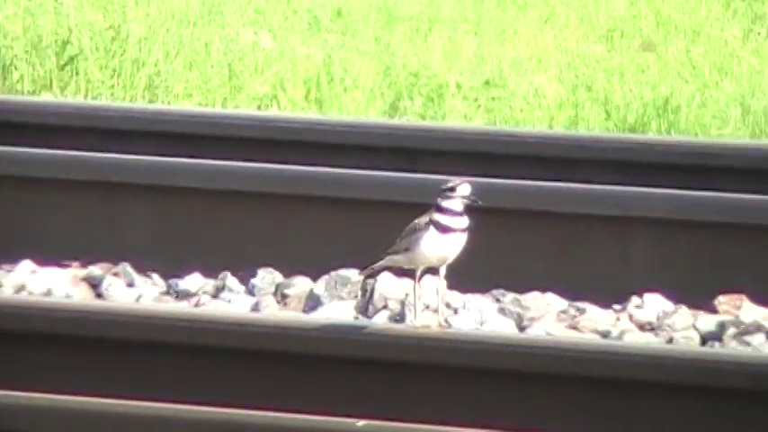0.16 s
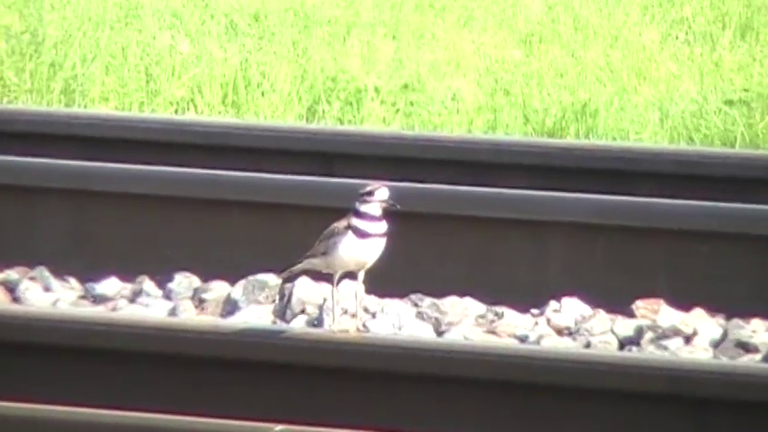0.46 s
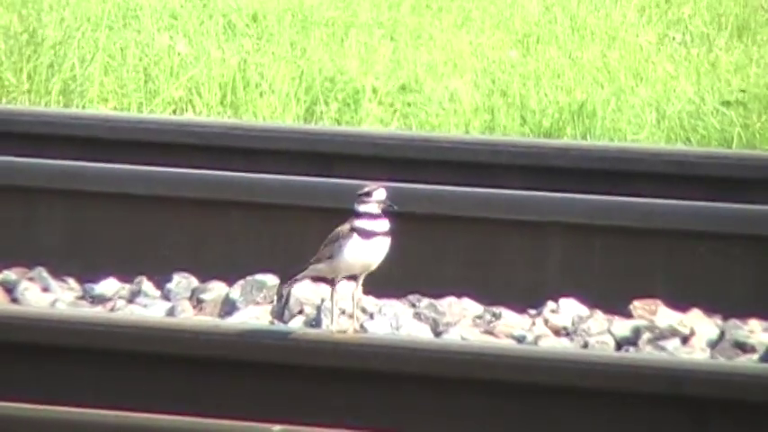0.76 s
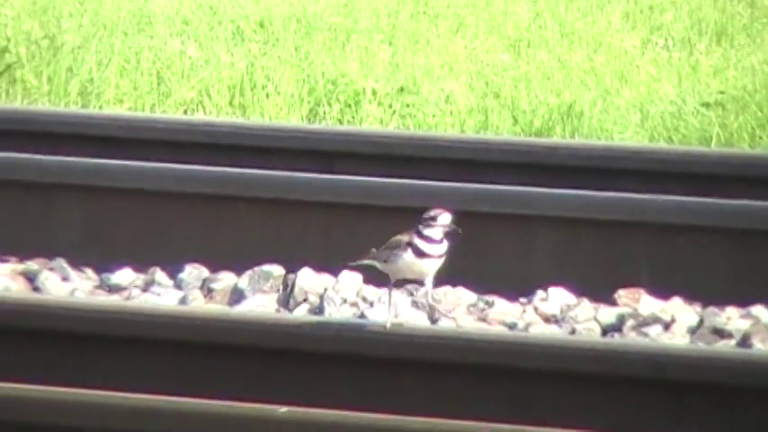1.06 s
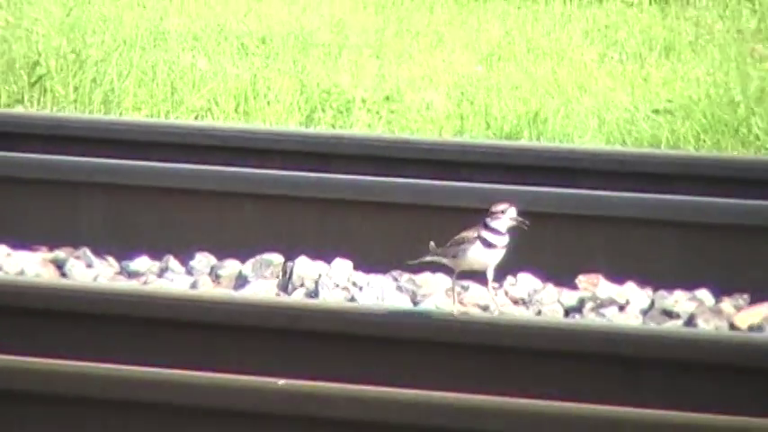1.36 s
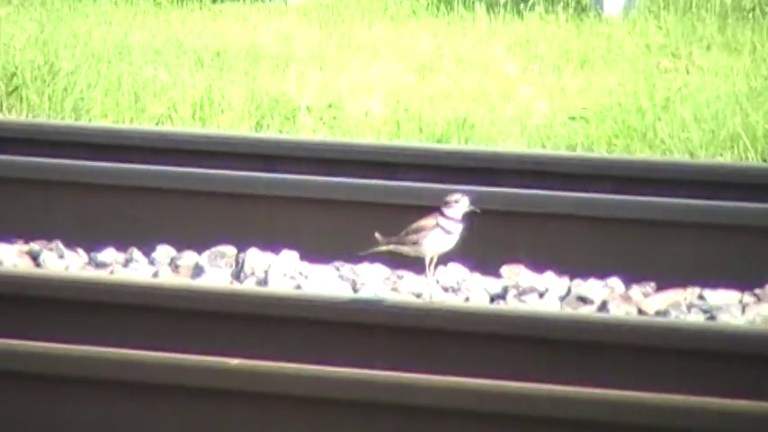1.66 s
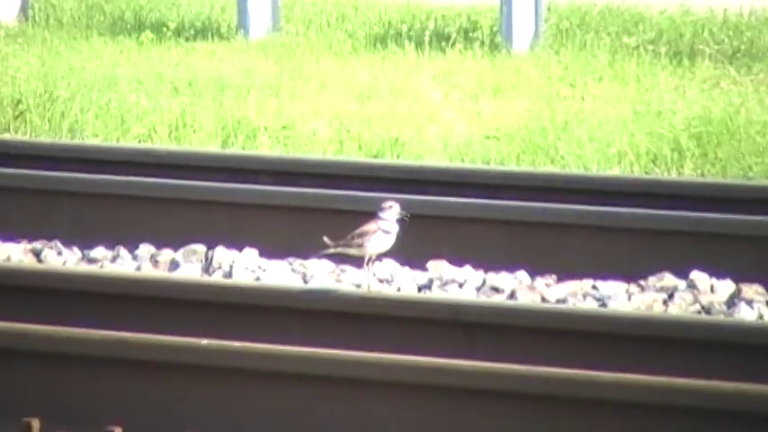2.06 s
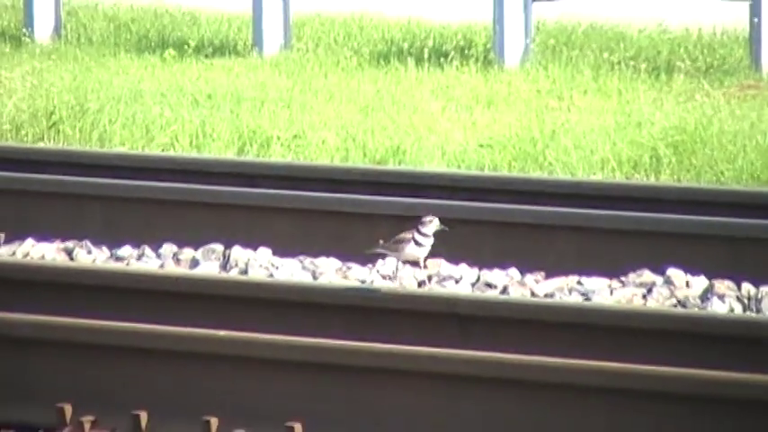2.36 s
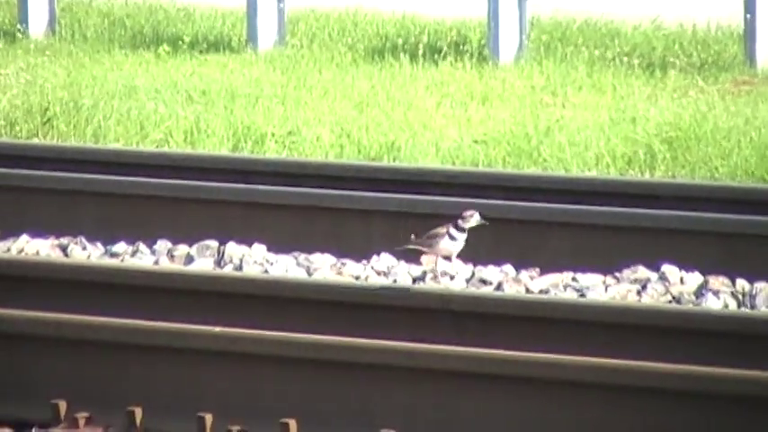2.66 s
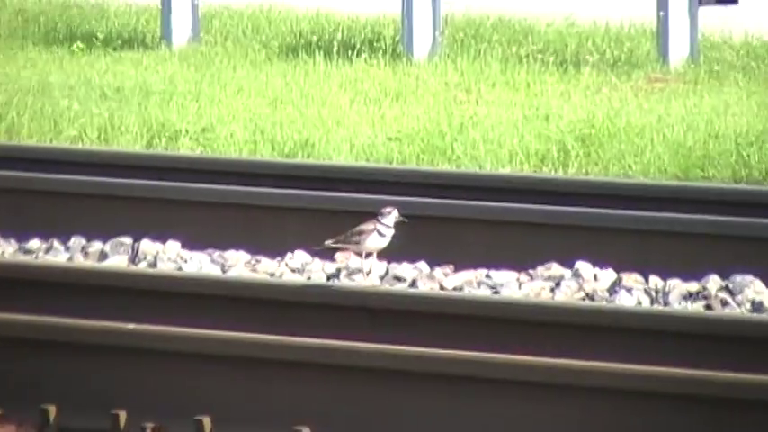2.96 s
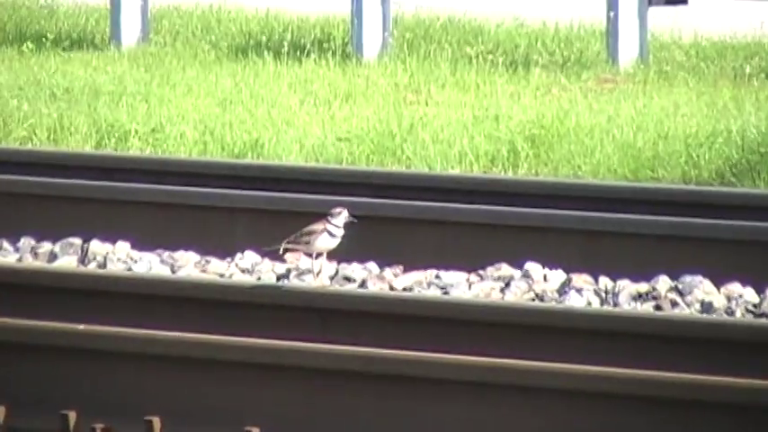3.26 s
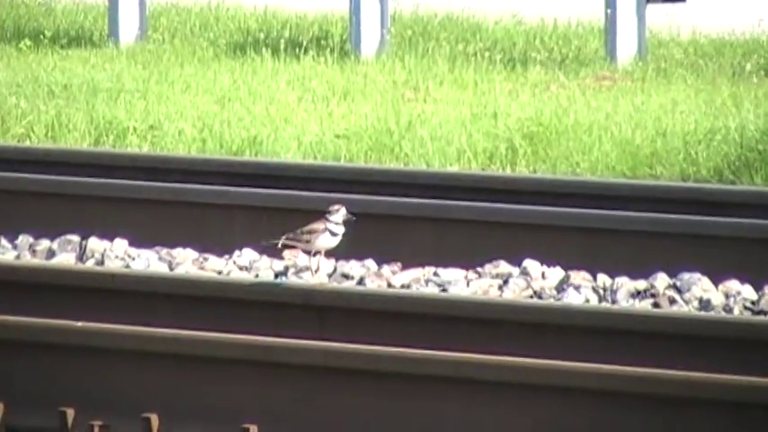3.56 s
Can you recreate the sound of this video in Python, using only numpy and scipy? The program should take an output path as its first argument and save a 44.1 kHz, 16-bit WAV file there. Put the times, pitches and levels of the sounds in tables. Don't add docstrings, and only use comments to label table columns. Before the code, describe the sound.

Sharp piping bird calls repeat evenly outdoors while a heavy truck swells past over distant traffic.

```python
import sys
import numpy as np
from scipy import signal
from scipy.fft import rfft, irfft, next_fast_len
from scipy.io import wavfile
from scipy.ndimage import uniform_filter1d

SR = 44100
rng = np.random.default_rng(int(sys.argv[2]) if len(sys.argv) > 2 else 0)


def natural_amplitude(level_db):
    exponent = np.asarray(level_db, float) / 20
    return 10 ** exponent


def transcribe(u):
    v = np.clip(np.atleast_2d(u).T, -1, 1)
    q = np.round(v * 32767).astype(np.int16)
    wavfile.write(sys.argv[1], SR, q)


N = 164052


def rms_one(x):
    return x / np.sqrt(np.mean(x ** 2) + 1e-20)


def in_time(rows, start=0):
    s, *columns = np.transpose(rows)
    return [np.interp(np.arange(N) / SR - start, s, c) for c in columns]


def at_hz(points, hz):
    return np.interp(np.log(hz), np.log(np.array(points)[:, 0]), np.array(points)[:, 1])


def drift(rate):
    r = np.exp(-80 * np.pi * rate / SR)
    slow = signal.lfilter([1], [1, -2 * r, r * r], rng.standard_normal(N // 40 + 2002))[2000:]
    return np.interp(np.arange(N) / 40, np.arange(len(slow)), rms_one(slow))


def sing(hz):
    return np.sin(2 * np.pi * np.cumsum(hz) / SR)


def resonate(x, hz, width_hz):
    r = np.exp(-np.pi * width_hz / SR)
    poles = [1, -2 * r * np.cos(2 * np.pi * hz / SR), r * r]
    return signal.lfilter(np.array([1, 0, -1]) * (1 - r * r) / 2, poles, x + 1e-18)


def pan(x, db):
    return x * natural_amplitude(np.array([[db / 2], [-db / 2]]))


def spread(mid, side, hz):
    # f/Hz, level/dB
    side_level = [(30, 5), (125, -17), (250, -14.5), (600, -12), (1100, -13), (2000, -4), (4000, -6.5),
                  (12000, -8)]
    # f/Hz, level/dB
    lean = [(30, -.4), (60, .3), (125, 2.1), (250, 3), (500, 1.6), (1000, .2), (4000, 0), (12000, .3)]
    return pan(mid + natural_amplitude(at_hz(side_level, hz)) * side * [[1], [-1]], at_hz(lean, hz))


def banded_noise(spectrum, patchy_db, tilt_db=0):
    out, together = 0, drift(1.5)
    edges = 21.5 * 2 ** np.arange(0, 9.7, .4)
    white = rng.standard_normal((2, 2, N))
    for k, (low, high) in enumerate(zip(edges, edges[1:])):
        band = signal.butter(2, [low, high], "band", fs=SR, output="sos")
        mid, side = signal.sosfilt(band, white[k % 2])
        hz = np.sqrt(low * high)
        octaves_out = max(np.log2(spectrum[0][0] / hz), 0) + max(np.log2(hz / spectrum[-1][0]), 0)
        level_db = at_hz(spectrum, hz) - 24.0 * octaves_out + tilt_db * np.log2(hz / 1000)
        flicker_db = patchy_db * (.5 * together + drift(6.6))
        out = out + natural_amplitude(level_db + flicker_db) * spread(mid, side, hz)
    return rms_one(out)


def bird():
    # t/s, level/dB, top f/Hz, held f/Hz, extra level at the top/dB
    calls = [
        (0.118, -28.5, 4750, 4304, 3),
        (0.7078, -27, 4854, 4356, 6),
        (1.3555, -30, 4914, 4350, 6),
        (2.081, -30.5, 4900, 4390, 5),
        (2.8607, -29.5, 4710, 4360, 3.5),
        (3.4995, -29.5, 5000, 4430, 2.5),
    ]
    # length/s, overtone level/dB, swell/Hz, upturn/Hz
    delivery = [(0.118, -2, 30, 170), (.122, -1, 50.4, 121), (.122, 1.5, 60.55, 109),
                (.125, 2.5, 45.05, 90), (.126, -1, 45, 230), (.124, -4, 79.5, 199)]
    # share of the length/0-1, leap/0-1, swell/0-1, upturn/0-1, level/dB
    shape = [(0, -.15, 0, 0, -18), (.035, 0.67, 0.03, 0, -5), (.09, 1, 0.08, 0.03, -0.5),
             (.17, 0.94, 0.05, 0.03, 1.5), (.25, .55, .3, 0, -0.5), (.37, 0, 0.79, 0.04, -0.5),
             (.54, 0.02, 1, 0.03, 1), (.76, 0, 0, 0, 1), (.93, 0.06, 0.1, 0.6, 0), (1, 0.05, 0, 0.9, -27)]
    # multiple of the strong tone, level/dB, extra level at the top of the leap/dB
    partials = [(.5, -28, 2), (1, 0, 0), (2, -25, 5), (2.5, -31, 3), (3, -28, 0)]
    waver_hz, flutter_db = 9 * drift(46), .8 * drift(90)
    out = np.zeros(N)
    share, lifts, swells, upturns, levels_db = np.transpose(shape)
    for (start, db, top_hz, held_hz, top_db), row in zip(calls, delivery):
        length, bright_db, swell_hz, upturn_hz = row
        now = slice(int(start * SR), int((start + length) * SR))
        u = np.linspace(0, 1, now.stop - now.start)
        lift = uniform_filter1d(np.interp(u, share, lifts), size=200)
        bends_hz = swell_hz * swells + upturn_hz * upturns
        bend_hz = uniform_filter1d(np.interp(u, share, bends_hz), size=400)
        hz = held_hz + lift * (top_hz - held_hz) + bend_hz + waver_hz[now]
        phase = 2 * np.pi * np.cumsum(hz) / SR
        shape_db = uniform_filter1d(np.interp(u, share, levels_db), size=120)
        gain = natural_amplitude(db + shape_db + top_db * np.clip(lift, 0, 1) + flutter_db[now])
        for multiple, partial_db, leap_db in partials:
            level = natural_amplitude(partial_db + bright_db * (multiple != 1) + leap_db * lift)
            out[now] += gain * level * np.sin(multiple * phase)
    return out


def field(x):
    # delay/s, level/dB, pan/dB
    echoes = [
        (0.058, -26, 2),
        (.021, -28, -2),
    ]
    t60_s, tail_db, blur_hz = 1.3, -23.5, 40
    out = 0
    for delay, db, pan_db in echoes:
        echo = np.roll(x, int(delay * SR)) * (np.arange(N) > delay * SR)
        out = out + pan(natural_amplitude(db) * echo, pan_db)
    t = np.arange(SR) / SR
    whole = signal.hilbert(x, next_fast_len(N))[:N]
    for path in range(3):
        tail = rng.standard_normal((2, SR)) * natural_amplitude(-60 * t / t60_s) * np.clip(t / .04, 0, 1)
        tail = (tail[0] + .5 * tail[1] * [[1], [-1]]) / np.sqrt(3 * np.sum(tail[0] ** 2))
        turning = np.exp(2j * np.pi * np.cumsum(blur_hz * drift(60)) / SR)
        blurred = np.real(whole * turning)
        out = out + natural_amplitude(tail_db) * signal.fftconvolve(blurred[None], tail, axes=1)[:, :N]
    return out


def tyres():
    # t/s, level/dB, brightness in steps of 3.21 dB per octave
    passing = [
        (0, -67, 3.5),
        (.9, -43.5, 0.64),
        (1.9, -33, -.5),
        (2.35, -30.5, -0.41),
        (2.6, -28, -0.02),
        (3.1, -27.5, -0.24),
        (3.45, -32, 0.14),
        (3.72, -32, -0.17),
    ]
    # f/Hz, level/dB per Hz
    colour = [(150, -39), (250, -16), (365, -19), (421, -19), (709, -10), (1170, -7), (1920, -17),
              (8200, -30), (10900, -44), (14200, -82), (22000, -120)]
    pass_db, tilt_db = in_time(passing)
    return natural_amplitude(pass_db) * banded_noise(colour, patchy_db=1.03, tilt_db=3.21 * tilt_db)


def engine():
    # t/s, firing f/Hz, exhaust level/dB, firing thud level/dB
    revs = [(0, 74.94, -43, -35.5), (.35, 78.6, -37, -28.5), (.75, 81.17, -45, -40),
            (1.12, 85.04, -41.5, -34.5), (1.5, 87.4, -39, -59), (1.92, 90.7, -38.5, -41),
            (2.45, 95, -33, -48), (2.98, 100.4, -37.5, -43.5), (3.2, 95, -36, -50),
            (3.45, 88.74, -36.5, -45.5), (3.72, 82.9, -41.5, -39.5)]
    # t/s, f/Hz
    exhaust = [(0, 218), (.5, 221), (1, 297), (2.4, 366), (3.05, 356.9), (3.45, 224.3), (3.72, 202.5)]
    # order, level/dB
    orders = [(9, 2), (12, 3.5), (14, 3.5), (15, -2), (16, -0.5), (17, 0), (18, -4.5), (19, -10), (20, 3),
              (21, -5.5), (22, -0.5), (23, -1.5), (24, -1), (26, -14), (30, -1), (33, -9), (34, -6),
              (36, -11)]
    cylinders, pipe_width_hz = 6, 120
    firing_hz, exhaust_db, thud_db = in_time(revs)
    pipe_hz, = in_time(exhaust)
    cycle_hz = firing_hz / cylinders * (1 + 0.0017 * drift(3.76))
    phase = 2 * np.pi * np.cumsum(cycle_hz) / SR
    out = pan(natural_amplitude(thud_db + 1.0 + 2.0 * drift(5.8)) * np.sin(cylinders * phase), 0.21)
    for order, db in orders:
        pipe = 0.2 + 1 / (1 + ((order * cycle_hz - pipe_hz) / pipe_width_hz * 2) ** 2)
        tone = np.sin(order * phase + rng.uniform(0, 2 * np.pi))
        out = out + pan(natural_amplitude(exhaust_db + db + 2 * drift(3.4)) * pipe * tone, 3.5)
    return out


def panels():
    # f/Hz, width/Hz, level/dB, centre t/s, spread/s
    resonances = [(1185, 60, -46, 2.65, .25), (1555, 60, -48, 2.75, .2), (1380, 25, -47, 1.0, .6),
                  (1560, 90, -49, .8, 1.1), (870, 28, -45, 2.8, .2), (235, 80, -35, .35, .25),
                  (180, 60, -34, .75, .25), (190, 70, -37, 3.0, .2), (215, 70, -35, 3.5, .15),
                  (5200, 3000, -55, 1.12, .07), (700, 250, -43, 3.45, .25), (2500, 900, -52, 2.8, .5)]
    out, t = 0, np.arange(N) / SR
    for hz, width_hz, db, centre, spread_s in resonances:
        mid, side = resonate(rng.standard_normal((2, N)), hz, width_hz)
        facing = np.exp(-.5 * ((t - centre) / spread_s) ** 2)
        breakup_db = 3 * drift(9.5)
        out = out + natural_amplitude(db + breakup_db) * facing * rms_one(spread(mid, side, hz))
    return out


def whines():
    # t/s, f/Hz, level/dB
    gears = [
        [(2.3, 1195, -62), (2.41, 1189, -40), (2.55, 1173, -41), (2.64, 1157, -47), (2.72, 1165, -41.5),
         (2.9, 1199, -40), (3.0, 1207, -60)],
        [(2.35, 1530, -62.5), (2.45, 1530, -50), (2.6, 1560, -41), (2.7, 1555, -59), (2.79, 1577, -40),
         (2.86, 1558, -49), (2.95, 1555, -42), (3.15, 1540, -57)],
    ]
    out = 0
    for rows in gears:
        hz, db = in_time(rows)
        flutter_db = 1.5 * drift(18)
        out = out + natural_amplitude(db + 4.5 + flutter_db) * sing(hz + 5 * drift(13.2))
    return out


def whistles():
    # t/s, length/s, start f/Hz, end f/Hz, level/dB
    far = [
        (3.03, .05, 5050, 5080, -55),
        (3.085, .268, 5012, 5030, -42.5),
        (3.36, .075, 4960, 5020, -51),
        (3.546, .034, 5120, 4760, -42),
        (3.58, .18, 4905, 4870, -41),
    ]
    # t/s, length/s, start f/Hz, end f/Hz, level/dB
    chips = [
        (3.484, .016, 7050, 7150, -47),
        (3.498, .014, 7150, 7750, -47),
        (2.851, .014, 7800, 7900, -49),
        (2.866, .018, 8200, 7950, -47),
        (2.985, .02, 7100, 7200, -53),
    ]
    out, fading_db, waver_hz = np.zeros(N), 1.3 * drift(8.5), 9 * drift(27)
    for start, length, from_hz, to_hz, db in far + chips:
        u = np.clip((np.arange(N) / SR - start) / length, 0, 1)
        edge = np.clip(np.minimum(u / .3, (1 - u) / 0.029), 0, 1)
        settle_hz = 90 * np.exp(-u * length / .04) * (length > .1)
        hz = from_hz + u * (to_hz - from_hz) + waver_hz + settle_hz
        out += natural_amplitude(db + fading_db * min(length / 0.12, 1)) * edge * sing(hz)
    return out


def ticks():
    # t/s, level/dB, centre f/Hz, t60/s, pan/dB
    creaks = [(0.0331, -20.5, 6540, 0.0092, 0), (0.033, -29, 2460, 0.0097, -5),
              (0.0334, -32, 3900, .007, -7), (.739, -33, 5800, 0.014, -12), (.748, -42, 4520, 0.015, -2),
              (0.974, -24.5, 764, 0.049, -4), (1.040, -35, 3508, .01, -7.5),
              (1.103, -34, 3550, 0.0093, -11), (1.169, -24, 880, 0.05, -10), (1.722, -39, 8130, .01, -3),
              (1.762, -49, 7500, 0.011, -9), (1.774, -35.5, 8300, 0.02, 4), (1.994, -36, 4990, .01, -2),
              (2.115, -36, 3199, .02, -14), (2.852, -32, 7798, .01, -4), (3.5446, -16, 2610, 0.0044, -3.5),
              (3.547, -29, 1800, .008, -6), (3.545, -22, 5860, 0.0037, -6)]
    out, t = np.zeros((2, N + SR)), np.arange(2000) / SR
    noise = rng.standard_normal((len(creaks), 2, len(t)))
    noise[:, 0, 0] = 5
    for (s, db, hz, t60, pan_db), (mid, side) in zip(creaks, noise):
        burst = (mid + 0.27 * side * [[1], [-1]]) * natural_amplitude(-60 * t / t60)
        for again in range(2):
            burst = resonate(burst, hz, .9 * hz)
        first = int(s * SR)
        out[:, first:first + len(t)] += pan(natural_amplitude(db) * burst / np.abs(burst).max(), pan_db)
    return out[:, :N]


def traffic():
    # f/Hz, level/dB
    bed = [(30, -18.5), (100, -1), (300, -3.5), (700, -9), (1500, -16.5), (2000, -29), (4200, -59),
           (9300, -43.5)]
    return natural_amplitude(-30) * banded_noise(bed, patchy_db=1.6)


def scene():
    calls = bird() + whistles()
    lorry = tyres() + engine() + panels() + whines()
    return pan(calls, -1.4) + field(calls) + lorry + ticks() + traffic()


def top_cut(x):
    return signal.sosfilt(signal.butter(12, 15740, fs=SR, output="sos"), x)


def record(dry):
    # f/Hz, phase/rad
    port_phase = [(30, 2.8), (70, 1.3), (140, .15), (4800, -.2), (6300, -1.1), (8600, -1.3), (10500, -2.6),
                  (14000, -1.6)]
    hz = np.maximum(np.arange(N // 2 + 1) * SR / N, 1)
    x = irfft(rfft(dry) * np.exp(.5j * at_hz(port_phase, hz) * [[1], [-1]]), N)
    x = signal.sosfilt(signal.butter(4, 10500, fs=SR, output="sos"), x)
    mid, side = natural_amplitude(-85) * rng.standard_normal(dry.shape)
    hiss = mid + .6 * side * [[1], [-1]]
    x = signal.sosfilt(signal.butter(2, 30, "high", fs=SR, output="sos"), x + hiss)
    return top_cut(x)


dry = scene()
out = record(dry)
transcribe(out)
```